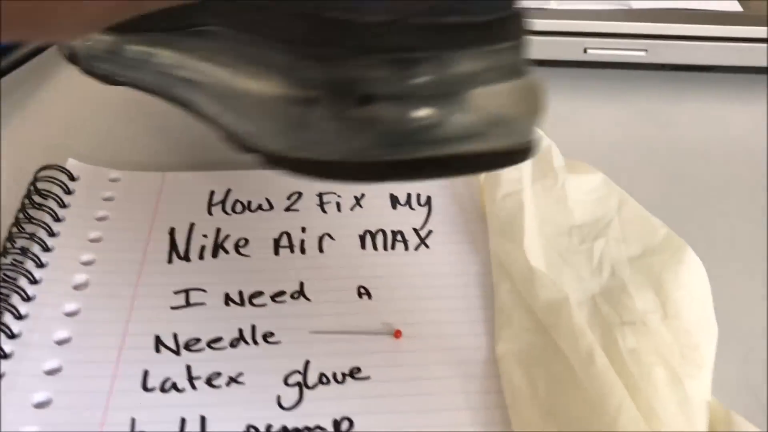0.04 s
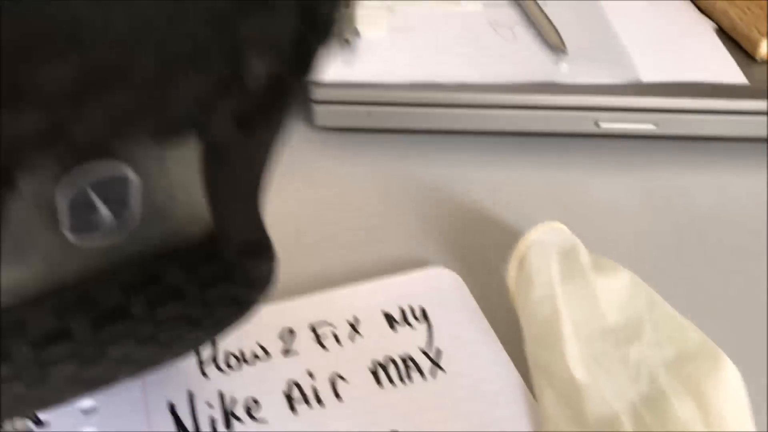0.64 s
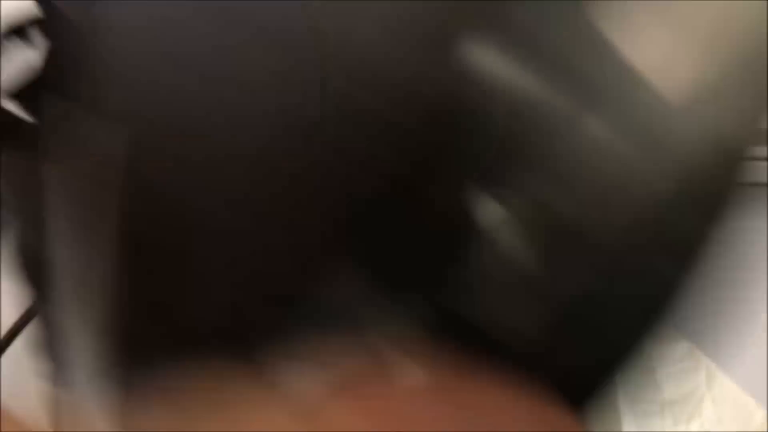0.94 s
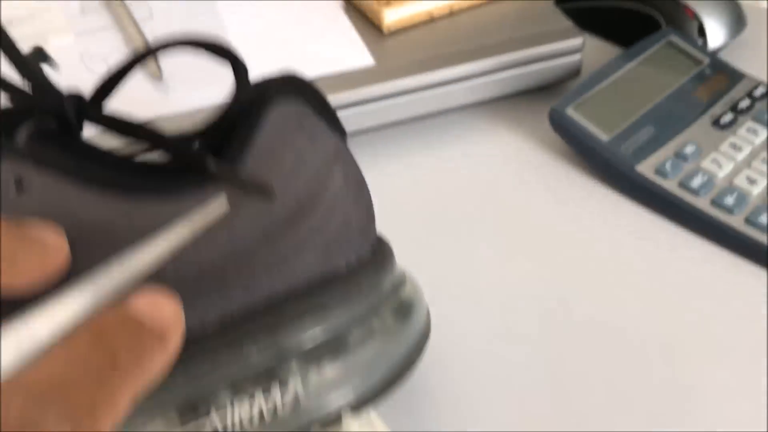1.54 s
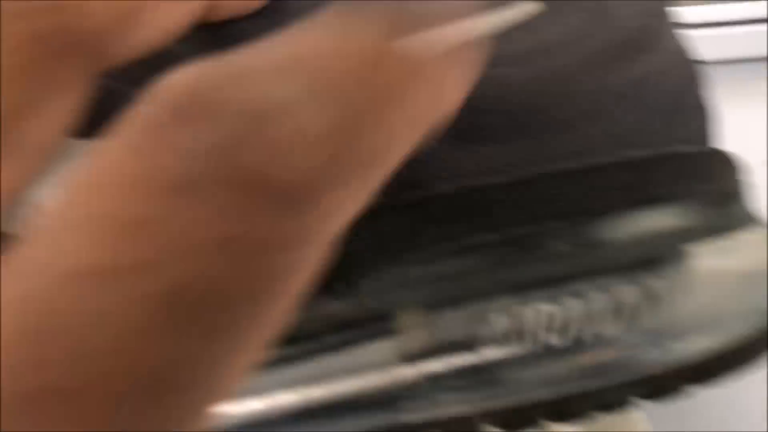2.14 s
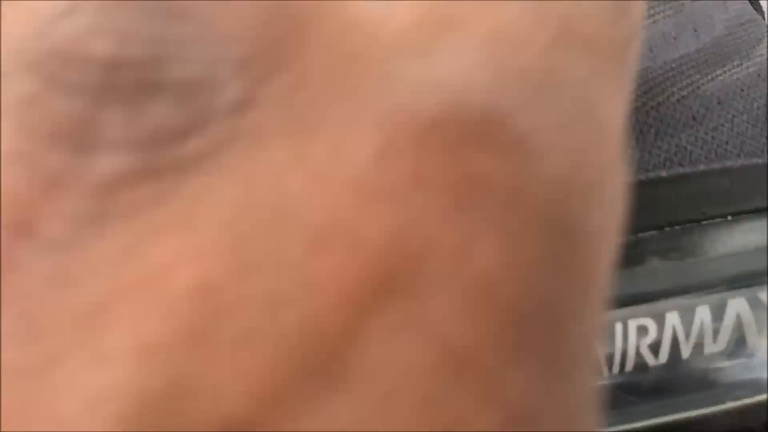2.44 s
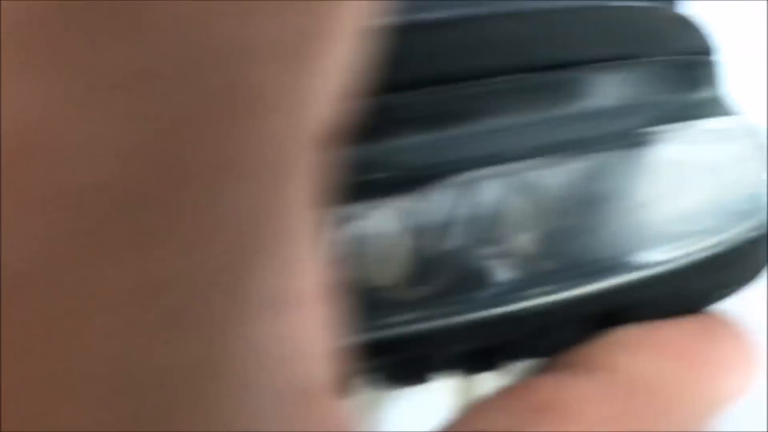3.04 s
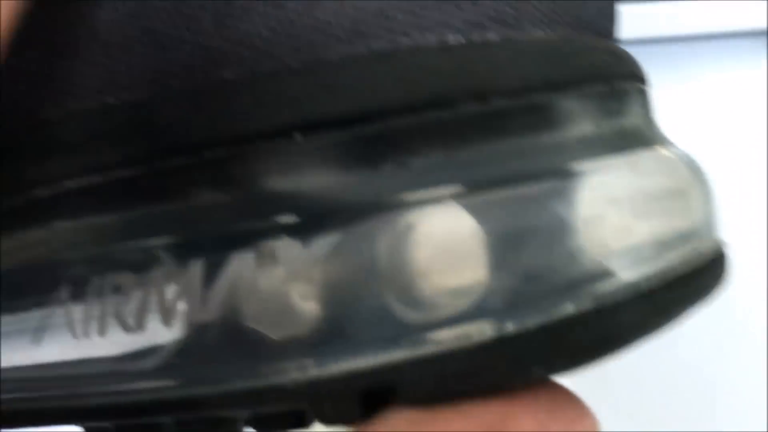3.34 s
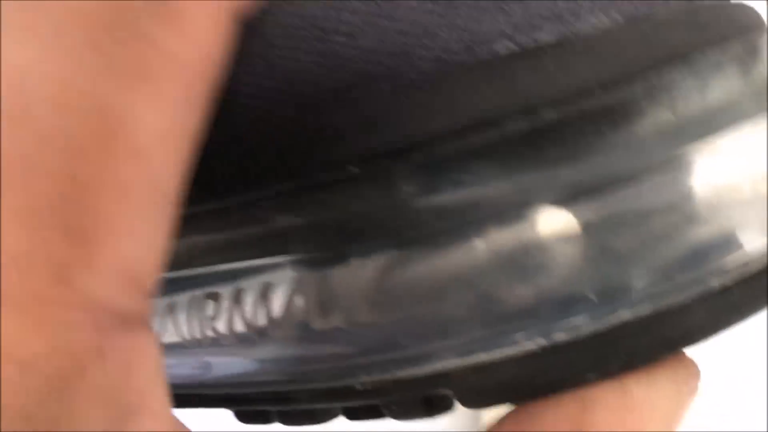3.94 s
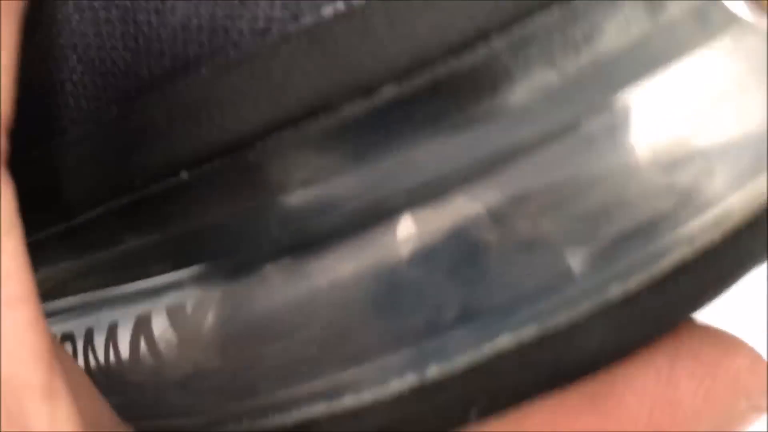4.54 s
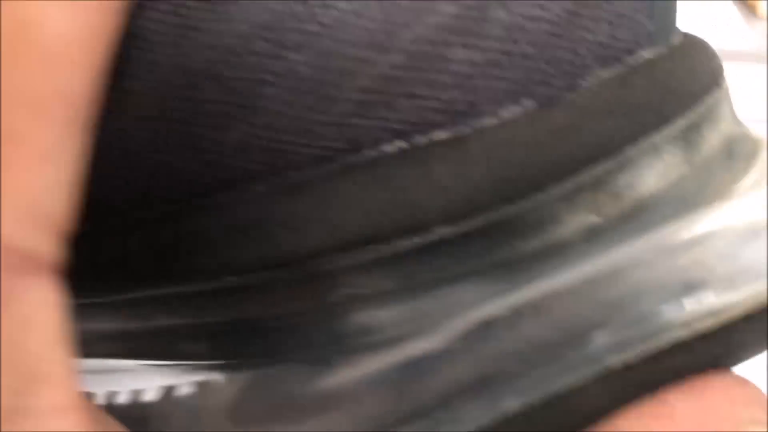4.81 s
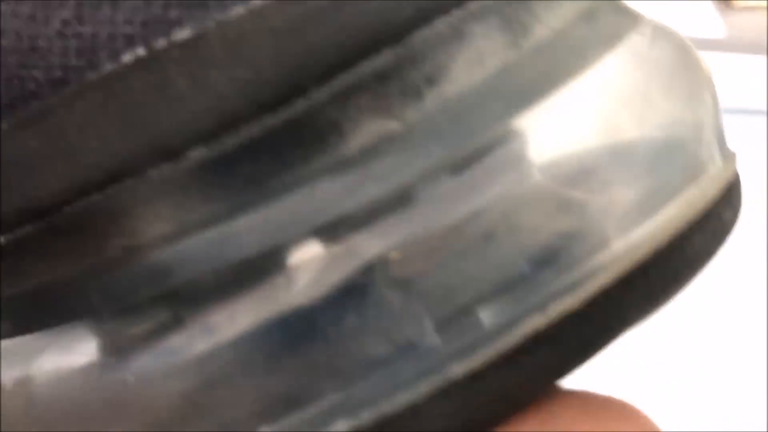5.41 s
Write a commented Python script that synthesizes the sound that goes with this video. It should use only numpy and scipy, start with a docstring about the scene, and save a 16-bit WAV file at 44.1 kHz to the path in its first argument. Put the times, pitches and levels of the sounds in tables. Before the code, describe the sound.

Right at the start a sneaker bumps a metal stand several times, making a bright, ringing clatter with knocks from the desk beneath. The loudest hit comes at about 0.4 seconds, and the ringing dies away by about 1 second. Rubbing and faint squeaks lead into a quick cluster of dull, low thumps from 1.3 to 1.5 seconds as the sole lands and rocks on the desk, with small ticks of laces. From then on a hand turns and squeezes the shoe in soft, uneven, grainy strokes of skin over mesh and rubber. The heel's air cushion gives a short double pop at about 3.2 seconds. The rubbing grows brighter between 4 and 4.9 seconds, with raspy little squeaks. A sharper pop comes at about 5.3 seconds among light ticks. Everything is very close, in a small room with quiet air and a low, wavering hum.

```python
"""At a desk in a small room, a sneaker is picked up and bumps a metal stand, which clatters and rings.
Set down, the shoe thumps dully on the desk. Then a hand turns and squeezes it, very close by:
skin rubs and squeaks over mesh and rubber, laces tick and the air cushion in the heel pops.
Quiet room air and a low hum lie underneath."""
import sys
import numpy as np
from scipy import signal
from scipy.fft import rfft, irfft, next_fast_len
from scipy.io import wavfile
from scipy.ndimage import map_coordinates

SR = 44100
rng = np.random.default_rng(int(sys.argv[2]) if len(sys.argv) > 2 else 0)


def master(y):
    """Save y as 16-bit WAV."""
    cut = np.clip(np.atleast_2d(y).T, -1, 1)
    pcm = np.round(cut * 32767)  # scale
    wavfile.write(sys.argv[1], SR, pcm.astype(np.int16))


N = 250047

# Levels are relative. A spectrum sets how strong each pitch is; t60 is the time to fade by 60 dB.
# the shoe bumps the stand: t/s, metal ring/dB, desk thud/dB, scuff/dB, hardness/dB
BUMPS = [(0.1101, -16.5, -41, -32.5, 16.5), (0.1372, -34.5, -42.5, -34, 8), (0.1613, -9, -31, -16, 17.5),
         (0.175, -14.5, -45, -37, 10), (0.3715, -14, -3.5, -14, 10.5), (0.3842, -16, -10.5, -12.5, 6),
         (0.3963, -20, -9, -22, 11.5), (0.4922, -26, -29.5, -38, 10.5), (0.5101, -22.5, -22, -29.5, 3),
         (0.644, -18.5, -19, -34.5, 19), (0.6548, -20, -18.5, -46.5, 3.5), (0.784, -40, -39, -35, 2),
         (0.8937, -45, -42, -40, 13), (0.901, -44.5, -35.5, -37, 5.5)]
# clear ringing tones of the stand and the desk top: f/Hz, level/dB, t60/s
STAND_TONES = [(1480, -13, 0.2), (1581, -9, 0.34), (1552, -10.5, 0.36), (2194, -18.5, 0.2),
               (2745, -18.5, .33), (2770, -15.5, .3), (3370, -11.5, 0.13), (3686, -1.5, 0.18),
               (3633, -6, 0.22), (3744, -7, 0.31), (3750, -13, 0.13), (3950, -18.5, .27), (5990, -11, 0.29),
               (5700, -16.5, .45), (6770, -22, 0.39), (9050, -25.5, .33), (9500, -29.5, .33)]
DESK_TONES = [(220.6, -3, .68), (339.3, -3.5, 0.36), (447, -3, 0.17), (484, -1, 0.1), (632, 2, .19),
              (649, -2, 0.14), (768, -8, .24), (823, -11.5, 0.21), (890, -11, 0.33), (1258, -17.5, .25)]
# their clatter, made of tones too crowded to tell apart: f/Hz, level/dB
STAND_SPECTRUM = [(600, -26.5), (1100, -8), (1400, -3.5), (1600, -0.5), (1950, -8), (2450, -4), (2800, 0.5),
                  (3200, -1), (3700, 8.5), (4200, -2), (4800, -8.5), (5950, -10), (6800, -15), (14000, -25)]
DESK_SPECTRUM = [(120, -39.5), (160, -13), (200, -1), (270, 1.5), (330, 8), (450, 2.5), (720, -0.5),
                 (950, -2), (1200, -8), (1550, -8), (2000, -13), (2700, -17), (5000, -40)]
SCUFF_SPECTRUM = [(2500, -26), (4500, -1), (5700, 1), (7200, 0.5), (8200, -3.5), (9300, 0.5), (10500, -5),
                  (13000, -6.5), (16000, -14.5)]  # fabric brushing the stand: f/Hz, level/dB
CLATTER_FADE = [(200, 0.41), (1000, 0.38), (4000, 0.36), (9000, 0.33), (16000, 0.26)]  # how long clatter and scuff last: f/Hz, t60/s
# the first three rows are the stand's ringing wash mixed with rubbing, the rest are hand strokes: # t/s,
# rise/s, hold/s, release/s, level/dB, brightness step per layer/dB, middle layers' boost/dB
SWELLS = [(.11, 0.027, 0.29, .15, -50.5, 3, 4.5), (.44, 0.09, 0.012, 0.088, -38.5, -0.5, 3),
          (0.598, .05, 0.044, 0.15, -49.5, -4, 3.5), (.884, .022, 0.16, .31, -55.5, 2.2, -7),
          (1.072, .093, 0.023, .07, -53.5, 0, -7.5), (1.177, .02, 0.014, .08, -47.5, 2, -1.5),
          (1.271, .02, 0.0036, 0.054, -41, -6, 1), (1.307, 0.0335, 0.1, .2, -56.5, -3, -1),
          (1.569, .06, .004, .09, -56.5, -1.4, -1.5), (1.71, .08, .009, .12, -63, -0.5, 1),
          (1.852, 0.089, .085, 0.063, -73, -5.5, 5.5), (1.963, .05, 0.086, 0.028, -64.5, 0.6, 0.5),
          (2.143, .044, 0.013, .03, -61.5, 0, -1), (2.198, .038, .052, 0.14, -54.5, -0.44, 3),
          (2.308, 0.029, .02, 0.13, -67.5, -6, 2), (2.525, .013, .045, 0.049, -59.5, 0, -4.5),
          (2.614, .117, 0.01, .03, -59, 0, -2.5), (2.736, .014, .058, .13, -71, -4.8, 0.5),
          (2.883, .076, 0.076, 0.038, -69.5, -1.3, 5), (3.014, .06, .08, 0.17, -70.5, -4.5, 6),
          (3.15, .13, 0.035, 0.118, -60, 0.5, 2), (3.345, 0.021, 0.24, .03, -72.5, -5.5, 3),
          (3.518, .038, .006, 0.06, -55.5, 5.5, 4.5), (3.892, 0.079, .13, .14, -67, 3, 10),
          (4.068, 0.1, .012, 0.094, -52.5, 5.5, 10), (4.188, .04, .05, 0.12, -54.5, 1.76, 8),
          (4.387, 0.026, .02, .06, -66, -1.8, 5), (4.445, .005, 0.021, .08, -49, 6, 1),
          (4.6, .085, .095, .14, -61, 2, 7), (4.888, 0.0095, .05, 0.14, -73.5, -5, 7),
          (4.961, .09, 0.18, .1, -65, -4, 5), (5.376, 0.057, 0.035, .08, -59, 4.5, 5.5),
          (5.504, 0.01, 0.0081, .04, -62.5, 4.5, 3)]
# the four layers of rubbing, from dull to bright: f/Hz, level/dB
PALM_SPECTRUM = [(100, -13), (200, -2), (340, 0.5), (490, -3), (620, 2.5), (900, -4), (1200, -8),
                 (2500, -41.5)]
SOLE_SPECTRUM = [(500, -35.5), (950, -5), (1300, -1.5), (1750, 2.5), (2100, -1.5), (2700, -10), (5000, -43)]
MESH_SPECTRUM = [(1700, -32), (2200, -8.5), (2600, -4), (3000, -3), (4000, -4), (4800, -7), (6400, -5),
                 (7500, -12.5), (12000, -39)]
SKIN_SPECTRUM = [(4000, -26.5), (7000, -6), (9000, 1.5), (11000, -5), (13200, -1.5), (16000, -10)]
SOLE_THUMPS = [(0.254, -41, 95), (0.3723, -32, 78.2), (1.292, -17, 78.4), (1.3077, -15, 74),
               (1.3528, -23.5, 85.2), (1.393, -24, 75.3), (1.4398, -23.5, 84.7), (4.459, -45, 83)]  # the sole lands, rocks and presses on the desk: t/s, level/dB, f/Hz
THUMP_TONES = [(1, 0, .13), (1.5, -2.5, .05), (2.1, -9, .07), (3.3, -11, .11)]  # the desk's swing: multiple of the thump's pitch, level/dB, t60/s
CUSHION_POPS = [(3.2399, -21.5, 1380, 0.00078, -45), (3.246, -29.5, 1446, 0.00074, -45),
                (5.3424, -19, 1244, 0.001, -7.5)]  # the air cushion buckles: t/s, level/dB, f/Hz, swell/s, crack over pop/dB
CRACK_SPECTRUM = [(1200, -16.5), (2300, 9), (3500, -7), (6500, 2), (11500, 0), (16000, -7)]  # the crack in a pop: f/Hz, level/dB
# taps of laces, nails and tread: t/s, level/dB, bass over middle/dB, treble over middle/dB
SMALL_TAPS = [(0.0732, -58.5, 16, 20), (1.279, -30, -15, 2), (1.2884, -24, 0.5, -6), (1.2925, -24, 7.5, -2),
              (1.3914, -27, -4, -12.5), (1.4217, -36.5, 10, -3.5), (1.4636, -34, 4.5, -23),
              (1.4855, -45.5, 14, -17.5), (1.6367, -31.5, -2.5, 2.5), (2.5390, -47, 3, -8),
              (3.1138, -40, -17, -6), (3.1567, -45, -19, 2), (4.5355, -42.5, -14, -5),
              (5.1724, -35.5, -22, -6), (5.5153, -35.5, -24, -2.5)]
TAP_SPECTRUM = [(100, -12.5), (300, -6), (850, -4), (1900, -3), (3000, -7.5), (7000, -13), (16000, -17)]  # the noise of one tap: f/Hz, level/dB
# skin catches on rubber: t/s, length/s, level/dB, f/Hz, pitch spread/Hz
RUBBER_SQUEAKS = [(0.859, 0.43, -53, 445, 120.7), (1.164, 0.057, -45.5, 1143, 302),
                  (1.192, 0.044, -43, 800, 160), (1.618, 0.014, -42.5, 850, 90),
                  (4.123, 0.2, -43, 2110, 520), (4.479, 0.014, -42.5, 620, 60),
                  (4.486, 0.042, -57.5, 520, 69.6), (4.631, 0.22, -51.5, 1720, 559),
                  (5.41, 0.1, -52.5, 1800, 381)]
ECHO_FADE = [(100, 0.82), (1200, 0.28), (5000, 0.12), (15000, 0.1)]  # how long the room's echo lasts: f/Hz, t60/s
AIR_SPECTRUM = [(20, -13), (35, -5), (55, 6), (80, 6), (130, -1.5), (220, -8.5), (500, -11.5), (900, -9.5),
                (2000, -15.5), (4000, -21), (13000, -22.5), (16000, -25)]  # the room's steady hush: f/Hz, level/dB
HUM_LEVELS = [(0, -64.5), (.7, -65), (1.3, -58.5), (2.1, -58), (2.65, -55), (3.02, -62), (3.45, -55),
              (3.85, -63.5), (4.5, -57.5), (5.3, -69), (5.67, -70)]  # the hum swells and sinks: t/s, level/dB


def stand_bumps(level_db, scuff_burst_t60):
    """Each bump rings the stand, shakes the desk under it and scuffs the shoe's fabric."""
    out, t = np.zeros(N), np.arange(SR) / SR
    for start, ring_db, thud_db, scuff_db, hard_db in BUMPS:
        metal = blow(STAND_TONES, STAND_SPECTRUM, tones_db=2.0, hardness_db=hard_db,
                     contact_t60=0.032, scatter_db=2, head_samples=441)
        wood = blow(DESK_TONES, DESK_SPECTRUM, tones_db=-1, hardness_db=hard_db + 1.5,
                    contact_t60=0.035, scatter_db=1, head_samples=660)
        scuff = fade_by_pitch(coloured(rng.standard_normal(SR), SCUFF_SPECTRUM), CLATTER_FADE)
        scuff *= 1 + amp(hard_db - 5.5 - 60 * t / scuff_burst_t60)
        scuff /= np.std(scuff[:SR // 100])
        bump = amp(ring_db) * metal + amp(thud_db) * wood + amp(scuff_db) * scuff
        add(out, start, amp(level_db) * bump)
    # keep the clatter free of deep bass; the low thud comes from the thumps
    return signal.sosfilt(signal.butter(8, 178, 'high', fs=SR, output='sos'), out)


def blow(tones, spectrum, tones_db, hardness_db, contact_t60, scatter_db, head_samples):
    """A struck object gives a short burst, clear tones and a clatter; its start is scaled to level 1."""
    t = np.arange(SR) / SR
    hz, db, t60 = np.transpose(tones)[:, :, None]
    strength = amp(tones_db + db + scatter_db * rng.standard_normal(hz.shape) - 60 * t / t60)
    ring = np.sum(strength * np.sin(2 * np.pi * (hz * t + rng.random(hz.shape))), axis=0)
    clatter = fade_by_pitch(coloured(rng.standard_normal(SR), spectrum), CLATTER_FADE)
    contact = coloured(rng.standard_normal(SR), spectrum) * amp(hardness_db - 60 * t / contact_t60)
    hit = (ring + clatter + contact) * (1 - np.exp(-t / 0.00046))
    return hit / np.std(hit[:head_samples])


def rubbing_and_wash(release_drop_db):
    """The palm murmurs on the hollow shoe; sole, mesh and skin rasp above it.
    In the first three swells the same noise also makes the stand's ringing wash."""
    t, power = np.arange(N) / SR, np.zeros((4, N))
    tilt = np.arange(4) - 3 / 2  # a light, quick stroke favours the bright layers
    middle = np.array([0, 1, 1, 0])  # a firm grip brings out sole and mesh
    for start, rise, hold, release, db, bright_db, middle_db in SWELLS:
        swell = np.clip((t - start) / rise, 0, 1)
        fade = amp(-release_drop_db * np.clip((t - start - rise - hold) / release, 0, 10))
        layer_gains = amp(db + bright_db * tilt + middle_db * middle)
        power += (layer_gains[:, None] * swell * fade) ** 2
    palm, sole, mesh, skin = np.sqrt(power)
    return (palm * friction(PALM_SPECTRUM, grain_db=-7.5, grains_per_s=190, flutter_db=1.3)
            + sole * friction(SOLE_SPECTRUM, grain_db=-4, grains_per_s=500, flutter_db=1.2)
            + mesh * friction(MESH_SPECTRUM, grain_db=-4.5, grains_per_s=900, flutter_db=1.0)
            + skin * friction(SKIN_SPECTRUM, grain_db=-4.5, grains_per_s=3900, flutter_db=2.5))


def friction(spectrum, grain_db, grains_per_s, flutter_db):
    """Sliding makes a smooth rush, grainy with tiny slips, under uneven finger pressure."""
    slips = (rng.random(N) < grains_per_s / SR) * rng.standard_normal(N)
    rush = rng.standard_normal(N) + amp(grain_db) * unit(slips)
    return unit(coloured(rush, spectrum) * amp(flutter_db * wobble(90)))


def sole_thumps(rise_cycles):
    """The soft sole pushes the desk down, and it swings for a few cycles."""
    out, t = np.zeros(N), np.arange(SR // 2) / SR
    for start, db, hz in SOLE_THUMPS:
        swing = sum(np.sin(2 * np.pi * multiple * hz * t) * amp(tone_db - 60 * t / t60)
                    for multiple, tone_db, t60 in THUMP_TONES)
        add(out, start, -amp(db) * swing * (1 - np.exp(-t * hz / rise_cycles)))
    return out


def cushion_pops(sharpness, crack_t60):
    """The cushion's wall snaps through: a swing of two or three cycles, with a crack at its height."""
    out, t = np.zeros(N), np.arange(SR // 20) / SR
    for start, db, hz, swell, crack_db in CUSHION_POPS:
        bulge = (t / swell * np.exp(1 - t / swell)) ** sharpness
        crack = coloured(rng.standard_normal(len(t)), CRACK_SPECTRUM) * amp(crack_db - 60 * t / crack_t60)
        add(out, start, amp(db) * bulge * np.sin(2 * np.pi * hz * t))
        add(out, start + swell, amp(db) * crack)
    return out


def small_taps(level_db, t60, tail_db, tail_t60):
    """Laces, nails and tread make dry ticks, with a faint tail from the hollow shoe."""
    out, t = np.zeros(N), np.arange(SR // 5) / SR
    for start, db, bass_db, treble_db in SMALL_TAPS:
        fade = amp(-60 * t / t60) + amp(tail_db - 60 * t / tail_t60)
        hit = coloured(rng.standard_normal(len(t)), TAP_SPECTRUM) * fade
        add(out, start, amp(db + level_db) * tap_softness(hit, bass_db, treble_db))
    return out


def tap_softness(hit, bass_db, treble_db, low_hz=1100, high_hz=5000, head_samples=220):
    """Make a tap soft or hard by setting how much bass and treble it starts with."""
    bands = [(low_hz, 'low', bass_db), ((low_hz, high_hz), 'band', 0), (high_hz, 'high', treble_db)]
    out = np.zeros(len(hit))
    for edge, kind, band_db in bands:
        part = signal.sosfilt(signal.butter(4, edge, kind, fs=SR, output='sos'), hit)
        out += amp(band_db) * part / np.std(part[:head_samples])
    return out


def rubber_squeaks():
    """Skin sticks and slips on rubber: a narrow spread of pitch squeaks, a wide one rasps."""
    out = np.zeros(N)
    for start, length, db, hz, spread_hz in RUBBER_SQUEAKS:
        n = int(length * SR)
        phase = 2 * np.pi * hz * np.arange(n) / SR
        slipping = wobble(spread_hz)[:n] * np.sin(phase) + wobble(spread_hz)[:n] * np.cos(phase)
        add(out, start, amp(db) * np.hanning(n) * unit(slipping))
    return out


def room_echo(x, delay_s):
    """The small room throws the sound back, and the bass lingers longest."""
    tail = fade_by_pitch(rng.standard_normal(SR // 2), ECHO_FADE)
    tail[:int(delay_s * SR)] = 0
    return signal.fftconvolve(x, tail / np.linalg.norm(tail))[:N]


def background(air_db, hum_boost_db, hum_hz):
    """Quiet room air and a low, wavering hum."""
    t = np.arange(N) / SR
    hum = np.sin(2 * np.pi * hum_hz * t + 0.43 * wobble(3.9)) * amp(1.1 * wobble(4))
    hum_db = hum_boost_db + np.interp(t, *np.transpose(HUM_LEVELS))
    air = coloured(rng.standard_normal(N), AIR_SPECTRUM)
    return amp(air_db) * air + amp(hum_db) * unit(hum)


def amp(db):
    """Turn decibels into a number to multiply by."""
    return 10 ** (np.asarray(db) / 20)


def unit(x):
    """Scale x to an average (rms) level of 1."""
    return x / np.sqrt(np.mean(x ** 2) + 1e-20)


def value_at(table, hz):
    """Read between the rows of a (frequency, value) table on a log scale."""
    freqs, values = np.transpose(table)
    return np.interp(np.log(hz + 1), np.log(freqs + 1), values)


def wobble(rate):
    """A smooth curve through `rate` random points a second."""
    return map_coordinates(rng.standard_normal(int(N * rate / SR) + 4), [np.arange(N) * rate / SR])


def filtered(x, response):
    """Multiply each frequency of x by response(hz)."""
    size = next_fast_len(len(x) + 8192)
    return irfft(rfft(x, size) * response(np.fft.rfftfreq(size, 1 / SR)), size)[:len(x)]


def coloured(x, spectrum):
    """Shape x with a spectrum and scale it to level 1."""
    return unit(filtered(x, lambda hz: amp(value_at(spectrum, hz))))


def fade_by_pitch(x, fades):
    """Let each frequency of x die away at its own speed."""
    hz, t, slices = signal.stft(x, SR, nperseg=256)
    fade = amp(-60 * t / value_at(fades, hz)[:, None])
    return signal.istft(slices * fade, SR, nperseg=256)[1][:len(x)]


def add(track, start, sound):
    """Mix a sound into the track at `start` seconds."""
    part = track[max(round(start * SR), 0):][:len(sound)]
    part += sound[:len(part)]


def scene():
    """All the handling, heard close up in one channel."""
    stand = stand_bumps(level_db=-7.0, scuff_burst_t60=0.037)
    shoe = small_taps(level_db=-14.5, t60=0.014, tail_db=-18.5, tail_t60=0.11) + rubber_squeaks()
    shoe += sole_thumps(rise_cycles=0.21) + cushion_pops(sharpness=3.4, crack_t60=0.0055)
    echo = amp(-17) * room_echo(shoe, delay_s=0.0014)
    swells = rubbing_and_wash(release_drop_db=20)
    return (stand + shoe + echo + swells + background(air_db=-63, hum_boost_db=1, hum_hz=52.2))[None]


def record(dry, low_hz=30, top_hz=15900):
    """The microphone loses the deepest bass, rounds off the loudest peaks and cuts the top treble."""
    heard = signal.sosfilt(signal.butter(2, low_hz, 'high', fs=SR, output='sos'), dry[0])
    rounded = heard / (1 + np.abs(heard) ** 6) ** (1 / 6)
    return filtered(rounded, lambda hz: hz < top_hz)[None]


dry = scene()
out = record(dry)
master(out)
```